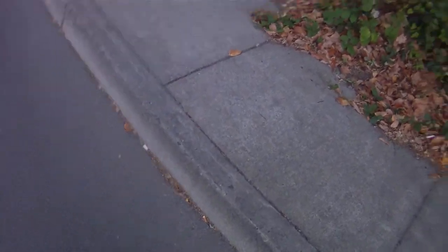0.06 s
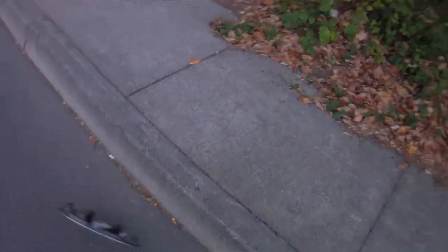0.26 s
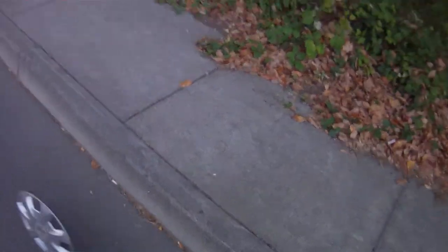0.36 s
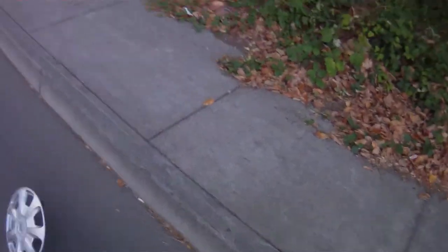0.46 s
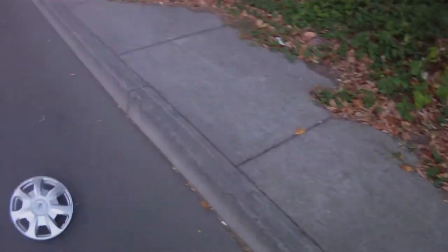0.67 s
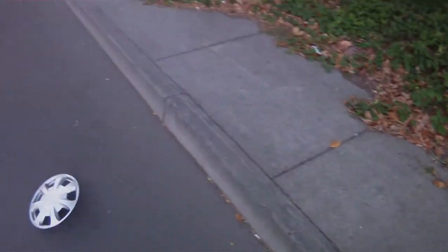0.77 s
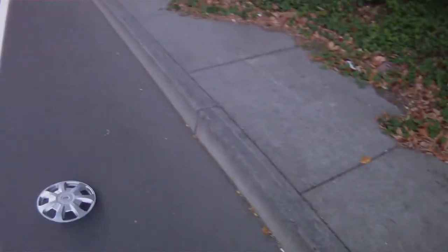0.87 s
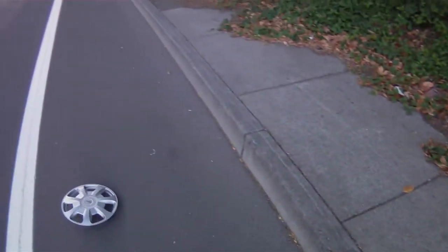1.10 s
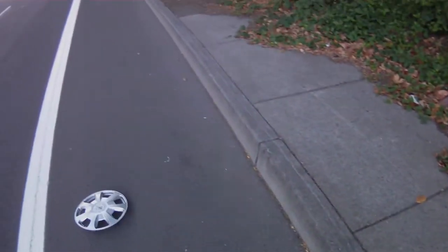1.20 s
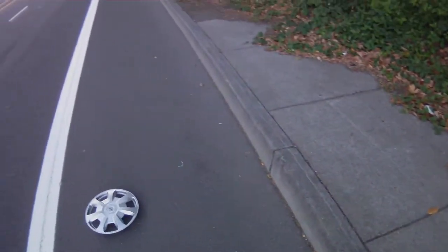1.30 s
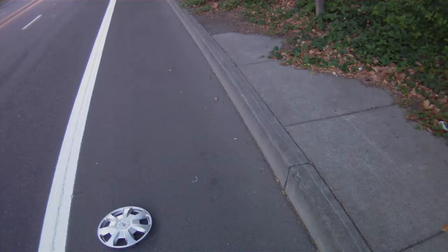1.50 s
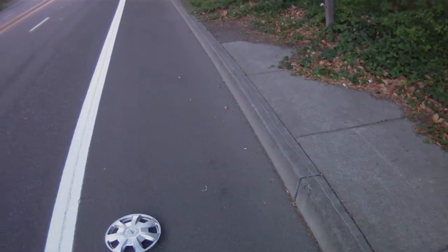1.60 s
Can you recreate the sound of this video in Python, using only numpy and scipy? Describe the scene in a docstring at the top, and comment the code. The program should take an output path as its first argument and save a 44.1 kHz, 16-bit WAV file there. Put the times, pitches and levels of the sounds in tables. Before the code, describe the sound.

Plastic hubcap hits the road with a sharp clatter, bounces, scrapes and rattles until it settles.

```python
"""First a moment of distant traffic, then a plastic hubcap lands on asphalt a few metres from a mono microphone.
It bounces on its rim and wobbles away: each rim contact is a hard tick and a short gritty skid that ring the
disc's modes, over a rolling grind. Flat slaps thump its dish with decaying sines. Kerb, road and hedge scatter
a short noise tail; the traffic is shaped noise whose bands flicker slightly."""
import sys
import numpy as np
from scipy import signal
from scipy.fft import rfft, irfft
from scipy.io import wavfile
from scipy.ndimage import uniform_filter1d

SR = 44100
rng = np.random.default_rng(int(sys.argv[2]) if len(sys.argv) > 2 else 0)


def volts_from_db(level):
    """Convert decibel levels to linear amplitude ratios."""
    exponent = np.asarray(level, float) / 20
    return 10 ** exponent


def int16_out(signal):
    """Quantize to a 16-bit WAV file."""
    q = np.round(np.clip(np.atleast_2d(signal).T, -1, 1) * 32767)
    wavfile.write(sys.argv[1], SR, q.astype(np.int16))


N = 72765
T = np.arange(N) / SR


def unit(x):
    """Scale to rms 1."""
    return x / np.sqrt(np.mean(x ** 2))


def walk(rate_hz):
    """Random levels, each held 1 / rate_hz seconds, smoothed twice into slopes."""
    hold = int(SR / rate_hz)
    steps = np.repeat(rng.standard_normal(N // hold + 1), hold)
    return uniform_filter1d(uniform_filter1d(steps, hold), hold)[:N]


# Rim contacts on the asphalt: t/s, relative level of the rim ring/dB, spokes against rim/dB,
# treble crack against rim/dB, skid length/s
RIM_CONTACTS = [(0.199, -28.5, -19, -32, 0.0025), (0.218, -24, -6.5, -12, 0.011),
                (0.23, -24, -7.5, -8, 0.0055), (0.2427, -33.5, -4, 2, 0.0076),
                (0.2773, -20.5, 8.5, 8, 0.0051), (0.2838, -15, -19, 6.5, 0.0062),
                (0.2872, -8.5, -4.5, 1, 0.003), (0.296, -22, -6, -40, 0.0098), (0.3055, -18, -6, -8, 0.006),
                (0.313, -29, -3, -20, 0.017), (0.3262, -24, -7, -23.5, 0.0015),
                (0.3323, -34, -3, -18, 0.006), (0.3472, -29.5, -4, -33, 0.011),
                (0.359, -40, -3, -29, 0.0044), (0.4958, -25, -7.5, -18.5, 0.0068),
                (0.5603, -17.5, -4, -21, 0.0073), (0.6053, -20.5, -1.5, -13, 0.011),
                (0.614, -16, -1.5, -11, 0.0074), (0.6225, -19, -8.5, -4, 0.005),
                (0.6876, -14.5, -2, -38, 0.0098), (0.696, -9.5, -2, -13.5, 0.0019),
                (0.7143, -19.5, -24, -19, 0.013), (0.7285, -17, -5, -43, 0.0049),
                (0.7404, -24, -7, -11.5, 0.0081), (0.755, -30.5, -7, -12, 0.016),
                (0.7718, -23.5, -11, -17, 0.0097), (0.7786, -32, 5, -27, 0.0093),
                (0.8331, -26.5, -1.5, -13, 0.0018), (0.8404, -30.5, -6, -24, 0.0062),
                (0.8891, -18, -6.5, -19.5, 0.0063), (0.8965, -22.5, -9, -14.5, 0.0093),
                (0.9382, -24.5, -2, -20, 0.0059), (0.945, -20.5, -0.5, -11.5, 0.0035),
                (0.991, -27.5, -5.5, -15, 0.003), (1.0206, -36.5, 3.5, -26, 0.0048),
                (1.031, -31.5, -5, -29, 0.0055), (1.061, -29.5, -1, -20, 0.004),
                (1.0704, -28.5, -8, -21, 0.0071), (1.0865, -31.5, -7.5, -25, 0.028),
                (1.1163, -27, -9, -17, 0.012), (1.151, -35, -7, -34, 0.009),
                (1.1656, -32, 0.5, -16, 0.0026), (1.255, -34.5, -6, -33, 0.0057),
                (1.273, -38, -3, -29, 0.0024), (1.3009, -24.5, -12.5, -35, 0.0028),
                (1.3178, -30.5, -8, -23, 0.01), (1.3563, -30.5, -10, -42, 0.0068),
                (1.377, -40, -6.5, -30, 0.0075), (1.4338, -33.5, -4, -32, 0.0017),
                (1.474, -36, -10, -25, 0.0035), (1.489, -32, -12, -36.5, 0.0035),
                (1.504, -29, -11, -25, 0.003), (1.5457, -45, -6, -25, 0.0044),
                (1.6094, -32, -9.5, -24, 0.012), (1.6238, -35.5, -7, -34, 0.011)]
# Modes of the disc, one table per part: f/Hz, level within the part/dB, t60/s
RIM_MODES = [(1824, -1, 0.014), (2008, 1, 0.043), (2217, 4, 0.027), (2423, 8, 0.02), (2806, 1, 0.0043)]
SPOKE_MODES = [(3393, 2.4, 0.012), (3523, 0.63, 0.042), (3640, 3.1, 0.013), (3918, 5.9, 0.021),
               (4205, 5.1, 0.017), (4320, 1.2, 0.026), (4478, 2.7, 0.012)]
TREBLE_MODES = [(5270, 5.5, 0.0016), (6010, 10, 0.0032), (6470, 2.5, 0.031), (7430, 10, 0.0019),
                (8260, -3, 0.0026)]
AIR_MODES = [(9600, -0.36, 0.00077), (11780, 0.39, 0.007), (12900, -1.1, 0.0061), (14550, -0.36, 0.0037)]  # the highest modes
# Contact force offset of rim, spokes, treble, air: level/dB
PART_DB = (-10, -9, -13, -31)
# Bands in which rim, spokes, treble and air radiate: low edge f/Hz, high edge f/Hz
PART_BANDS = [(1750, 3400), (3000, 6600), (5000, 14000), (9000, 22000)]


def hubcap():
    """Skids and rolling grind ring rim, spokes, treble and air modes; slaps ring the dish."""
    air_follows = 0.39  # share of the treble crack's change that the air modes follow
    crack_share = 0.73  # part of a skid through which treble and air crack
    times, rim_db, spokes_db, treble_db, lengths = np.array(RIM_CONTACTS).T
    relative_db = (0, spokes_db, treble_db, air_follows * treble_db)
    roll_db = (0, -7, -15, -30)
    skid_share = (1, 1, crack_share, crack_share)
    roll = rolling_grind()
    out = slaps()
    grain = grit()
    for k, modes in enumerate((RIM_MODES, SPOKE_MODES, TREBLE_MODES, AIR_MODES)):
        contact_db = rim_db + relative_db[k] + PART_DB[k]
        force = contact_forces(times, contact_db, lengths * skid_share[k], grain, len(modes))
        force = force + volts_from_db(roll_db[k]) * roll
        out = out + ring(force, modes, PART_BANDS[k])
    return out


def contact_forces(times, levels_db, lengths, grain, count):
    """Each contact is a hard tick in a gritty skid and pushes every mode by its own amount."""
    attack_s, release_s = 0.00039, 0.0029
    tick_s, tick_db = 0.0004, 19  # tick: delay into the skid, height against the skid's grain
    spread_db = 2  # how unevenly a contact pushes the modes
    out = np.zeros((count, N))
    mix = volts_from_db(spread_db * rng.standard_normal((len(times), count)))
    mix = mix / np.sqrt(np.mean(mix ** 2, axis=1, keepdims=True))
    mix = mix * (-1) ** np.arange(count)  # neighbouring modes swing opposite
    for start, db, length, mode_mix in zip(times, levels_db, lengths, mix):
        near = slice(int(start * SR), int((start + length) * SR) + 900)
        age = np.maximum(T[near] - start, 0)
        shape = (1 - np.exp(-age / attack_s)) * np.exp(-np.maximum(age - length, 0) / release_s)
        skid = grain[near] * shape
        force = skid * np.linalg.norm(shape) / np.linalg.norm(skid)  # same energy whatever the grain
        force[int(tick_s * SR)] += volts_from_db(tick_db)
        out[:, near] += (volts_from_db(db) * mode_mix)[:, None] * force
    return out


def grit():
    """Micro-impacts of asphalt grain with random signs, in uneven bursts as the rim chatters."""
    grain_db, chatter_db, chatter_hz = 3, 4, 1200
    size_db = grain_db * rng.exponential(size=N) + chatter_db * walk(chatter_hz)
    return unit(np.sign(rng.standard_normal(N)) * volts_from_db(size_db))


# Rolling grind between contacts, before its flicker: t/s, force level/dB
ROLL_LEVELS = [(0.15, -66), (0.822, -54), (1.65, -74.5)]


def rolling_grind():
    """The disc grinds over asphalt grain with a slow swell and a quick flicker in level."""
    flicker_db, flicker_hz = 6, 60.86
    level_db = np.interp(T, *np.array(ROLL_LEVELS).T, left=-90)
    return grit() * volts_from_db(level_db + flicker_db * walk(flicker_hz))


def ring(forces, modes, band_hz):
    """Forces ring damped modes heard through one band; before it, steady unit force gives rms 1."""
    out = 0
    total = np.sqrt(sum(volts_from_db(db) ** 2 for _, db, _ in modes))
    for force, (hz, db, t60) in zip(forces, modes):
        radius = np.exp(-np.log(1000) / (t60 * SR))  # decay per sample
        pole = radius * np.exp(2j * np.pi * hz / SR)
        gain = volts_from_db(db) / total * np.sqrt(2 * (1 - radius * radius))
        out = out + gain * signal.lfilter([1], [1, -pole], force).imag
    return signal.sosfilt(signal.butter(3, band_hz, "band", fs=SR, output="sos"), out)


# Flat slaps on the road: t/s, relative level/dB, favoured f/Hz
FLAT_SLAPS = [(.231, -30.5, 917), (.287, -26, 560), (.297, -31, 1184), (.294, -22, 690), (.315, -23, 690),
              (.342, -26.5, 625), (.720, -35.5, 540), (.741, -28, 540), (.779, -29.5, 563)]
# Modes of the dish: f/Hz, relative level/dB, t60/s
DISH_MODES = [(435, 1.5, 0.094), (540, 5, 0.035), (690, 4.5, 0.048), (946, -2, 0.032), (1094, -1, 0.053),
              (1350, 13.5, 0.023)]


def slaps():
    """Each slap sets off mostly the dish modes nearest its pitch, as decaying sines with a soft rise."""
    rise_s, favour_db_per_octave = 0.00097, 30
    out, age = np.zeros(N), T[:SR // 5]
    rise = 1 - np.exp(-age / rise_s)
    phases = rng.random((len(FLAT_SLAPS), len(DISH_MODES)))  # in turns
    for (start, slap_db, favoured_hz), slap_phases in zip(FLAT_SLAPS, phases):
        for (hz, mode_db, t60), phase in zip(DISH_MODES, slap_phases):
            off_pitch_db = favour_db_per_octave * abs(np.log2(favoured_hz / hz))
            fade_db = slap_db + mode_db - off_pitch_db - 60 * age / t60
            wave = volts_from_db(fade_db) * rise * np.sin(2 * np.pi * (hz * age + phase))
            out[int(start * SR):][:len(age)] += wave
    return out


def roadside(x):
    """Scattered echoes from kerb, road and hedge: the sound convolved with a decaying noise tail."""
    tail_db, t60_s, rise_s = -11, 0.29, 0.0032
    treble_db = -5  # share of differenced noise, which brightens the tail
    age = T[:SR // 2]
    noise = rng.standard_normal(len(age))
    noise = noise + volts_from_db(treble_db) * np.diff(noise, prepend=0)
    tail = noise * (1 - np.exp(-age / rise_s)) * volts_from_db(-60 * age / t60_s)
    tail = tail / np.sqrt(np.sum(tail ** 2))
    return volts_from_db(tail_db) * signal.fftconvolve(x, tail)[:N]


# Distant traffic spectrum: f/Hz, relative density level/dB
TRAFFIC_SPECTRUM = [(20, -39), (52, -27), (169, -12.5), (331, -9.5), (537, -1), (703, -5), (1080, -16),
                    (1710, -22), (2920, -19.5), (3720, -34), (15500, -53)]


def traffic():
    """Distant traffic: shaped noise in third-octave bands, each flickering slightly by itself."""
    level_db, flicker_db, flicker_hz = -44, 0.5, 11.1
    hz = np.maximum(np.fft.rfftfreq(N, 1 / SR), 1)
    table_hz, table_db = np.array(TRAFFIC_SPECTRUM).T
    shape_db = np.interp(np.log(hz), np.log(table_hz), table_db)
    noise = rfft(rng.standard_normal(N)) * volts_from_db(shape_db)
    out = 0
    for band in range(34):
        share = np.clip(1 - np.abs(3 * np.log2(hz / 10) - band), 0, 1)  # overlapping triangles from 10 Hz
        out = out + irfft(noise * share, N) * volts_from_db(flicker_db * walk(flicker_hz))
    return unit(out) * volts_from_db(level_db)


def scene():
    """The hubcap, its roadside echoes and the traffic at one microphone, on two equal channels."""
    cap = hubcap()
    return np.tile(cap + roadside(cap) + traffic(), (2, 1))


def band_limit(x):
    """A steep low-pass at the top of the band."""
    return signal.sosfilt(signal.butter(12, 16470, fs=SR, output="sos"), x)


def record(dry):
    """The microphone signal loses its top above 15.5 kHz through a steep low-pass."""
    low_pass = signal.ellip(8, 0.3, 50, 15500, fs=SR, output="sos")  # ripple 0.3 dB, stop band -50 dB
    finished = signal.sosfilt(low_pass, dry)
    return band_limit(finished)


dry = scene()
out = record(dry)
int16_out(out)
```